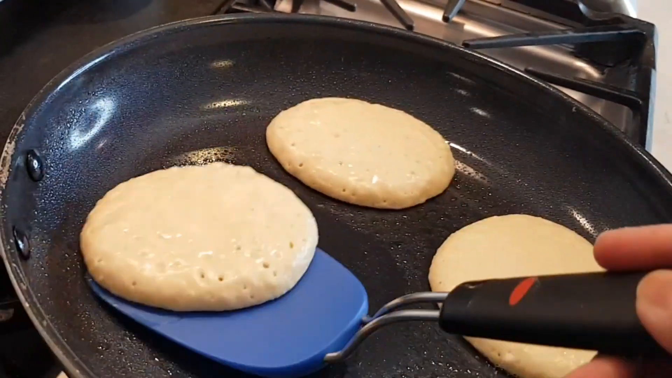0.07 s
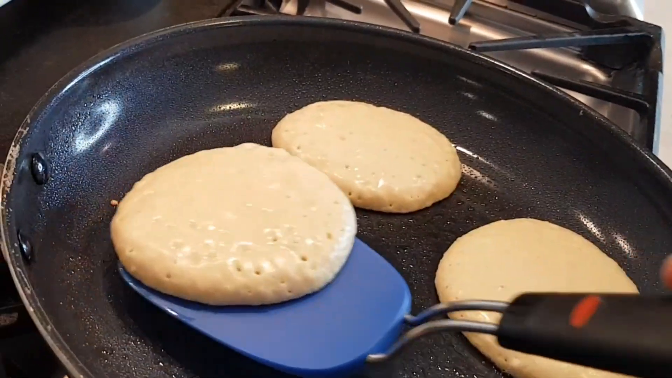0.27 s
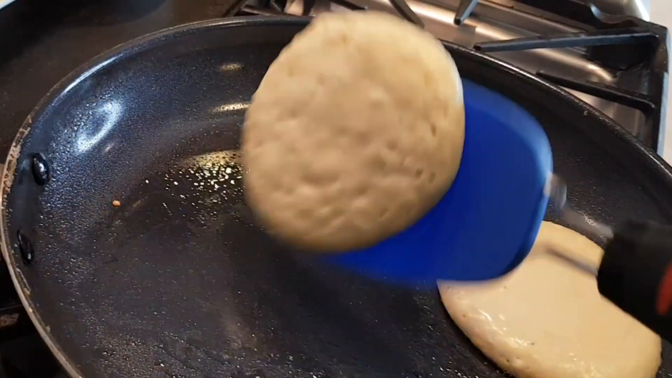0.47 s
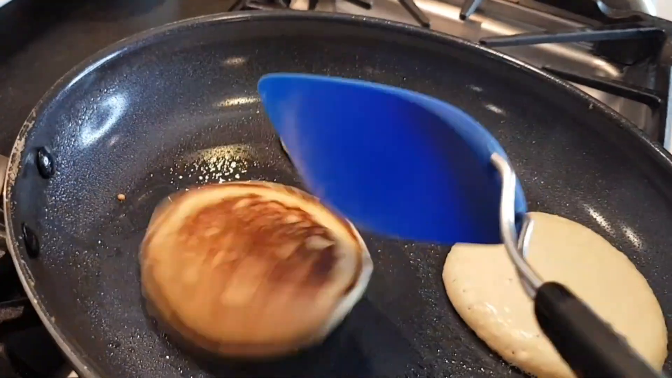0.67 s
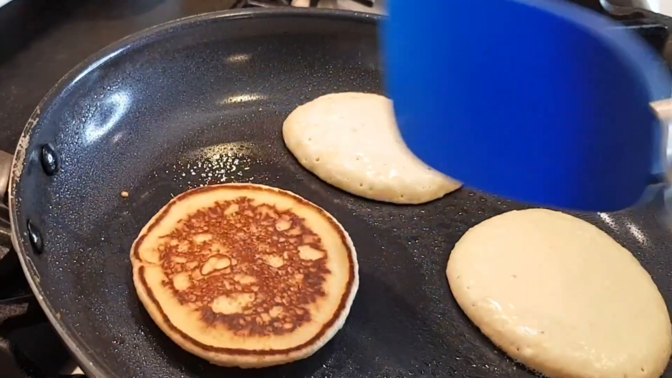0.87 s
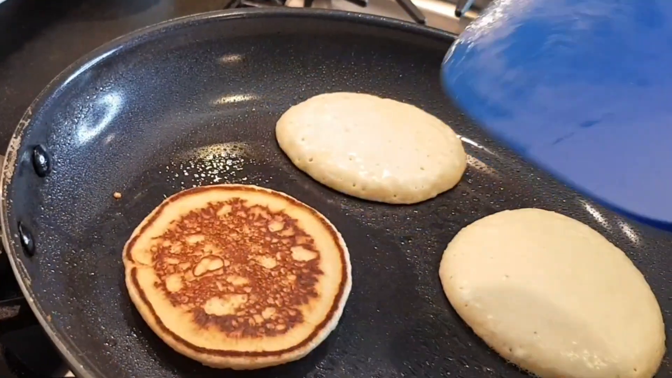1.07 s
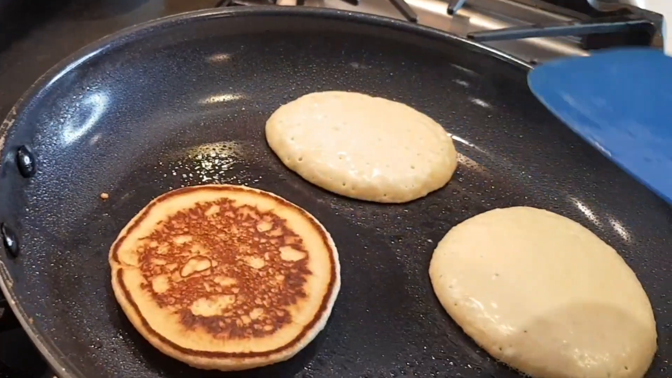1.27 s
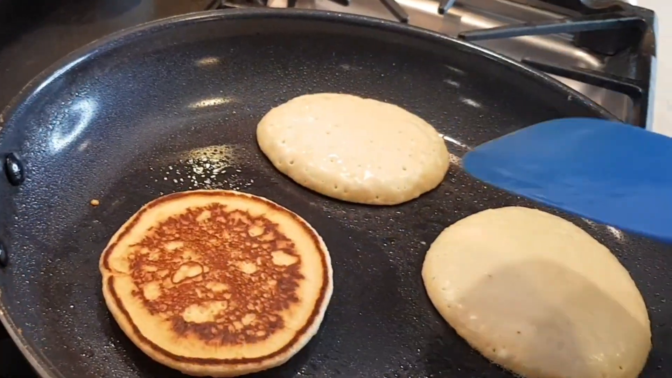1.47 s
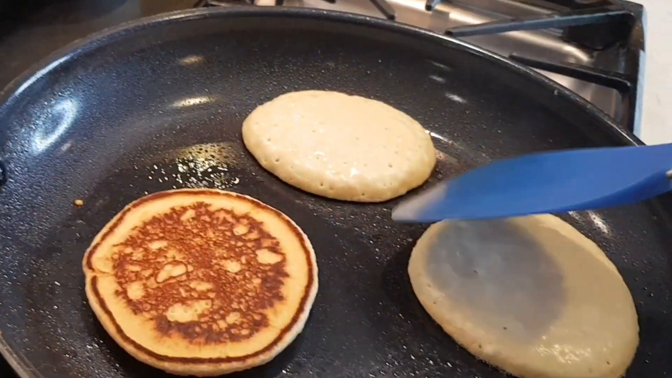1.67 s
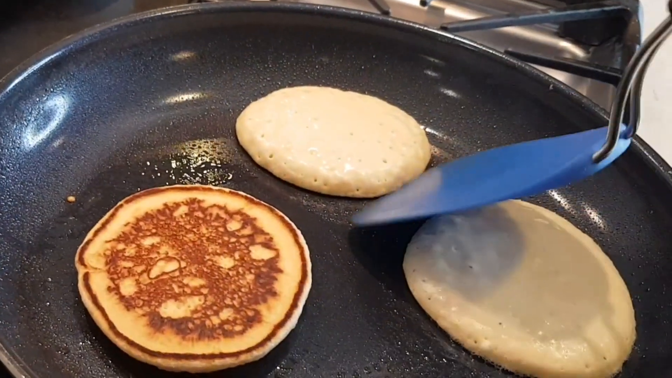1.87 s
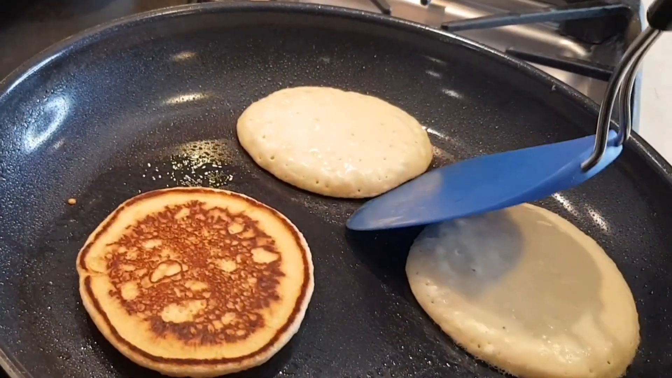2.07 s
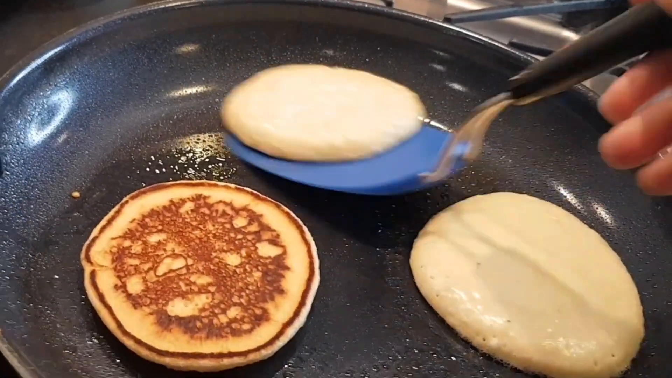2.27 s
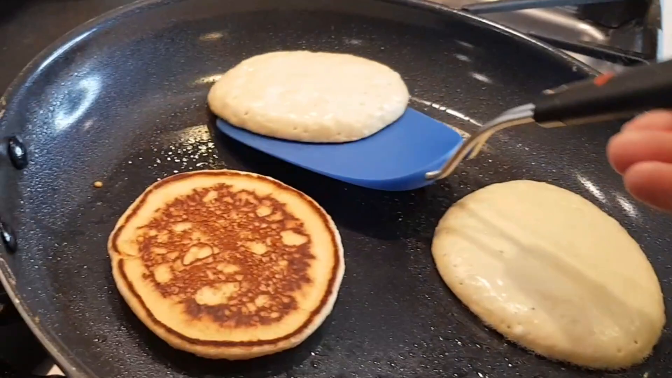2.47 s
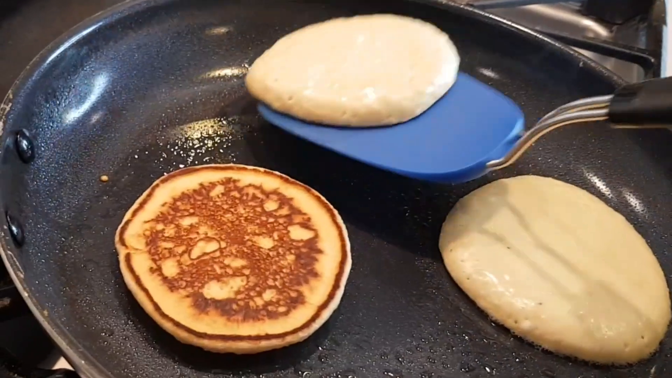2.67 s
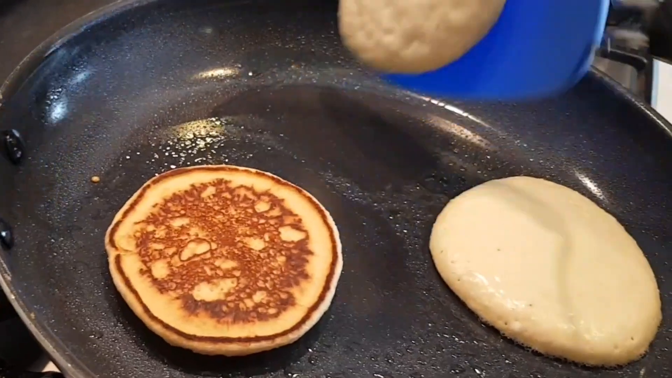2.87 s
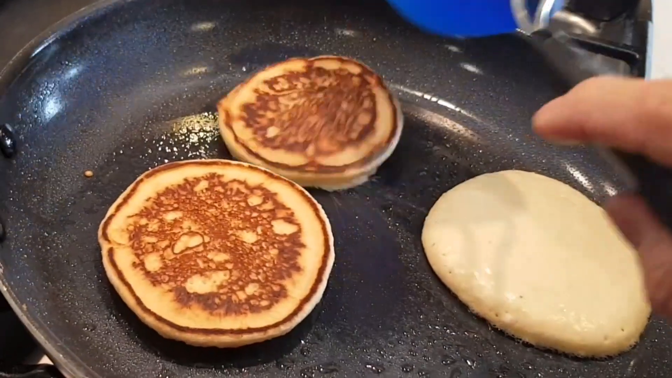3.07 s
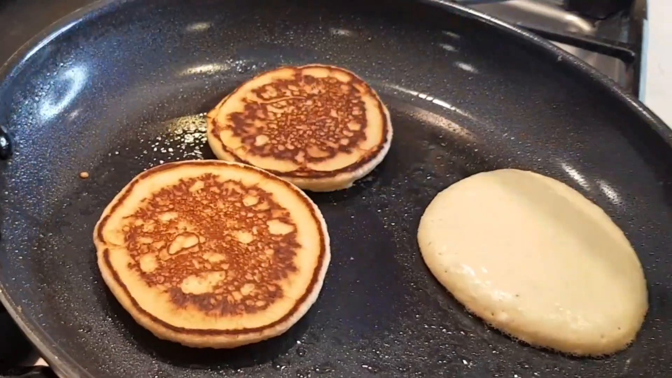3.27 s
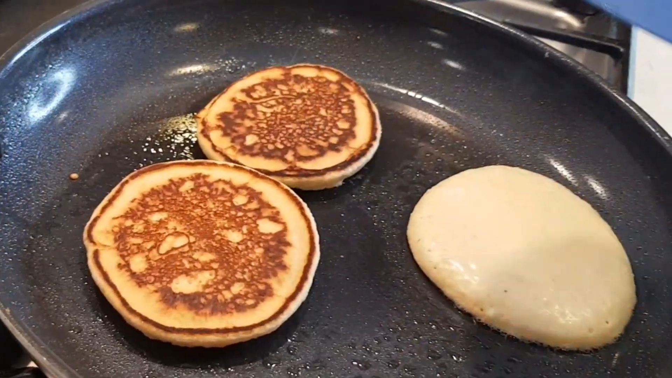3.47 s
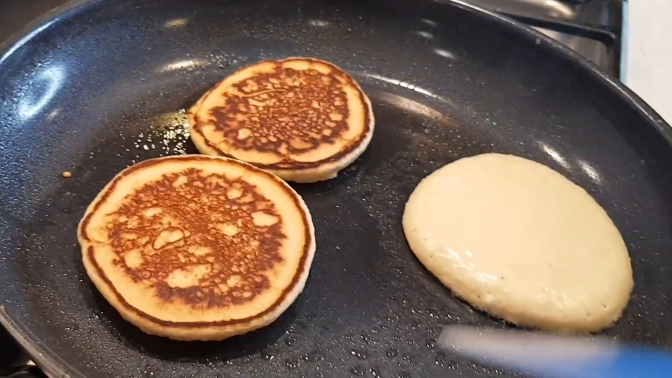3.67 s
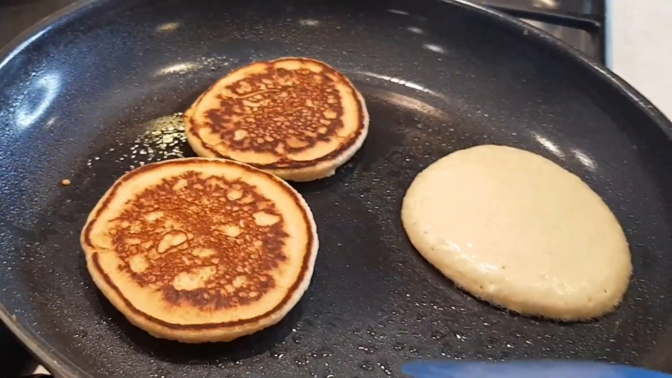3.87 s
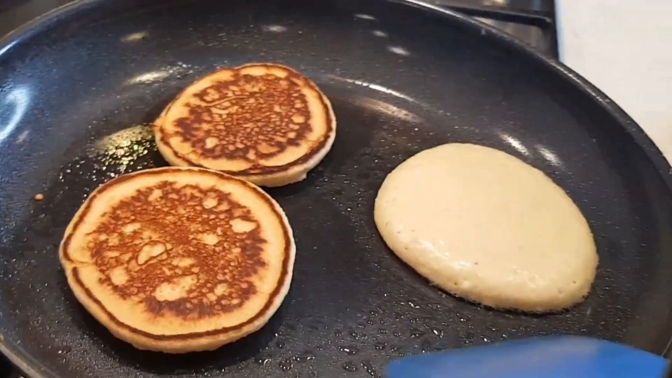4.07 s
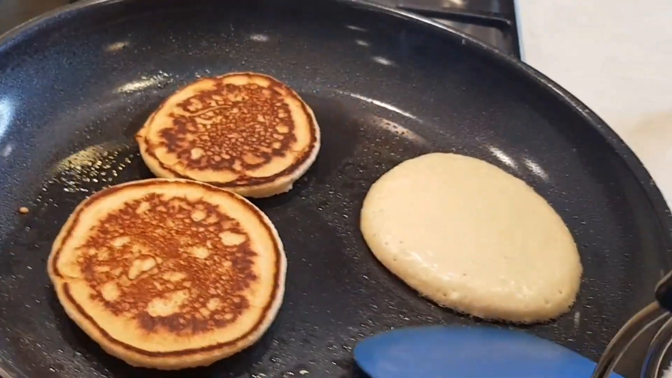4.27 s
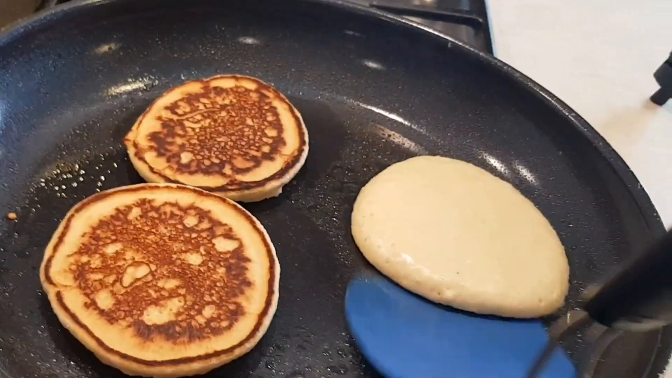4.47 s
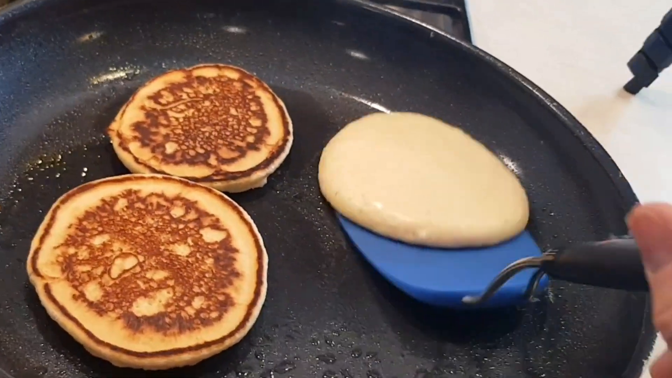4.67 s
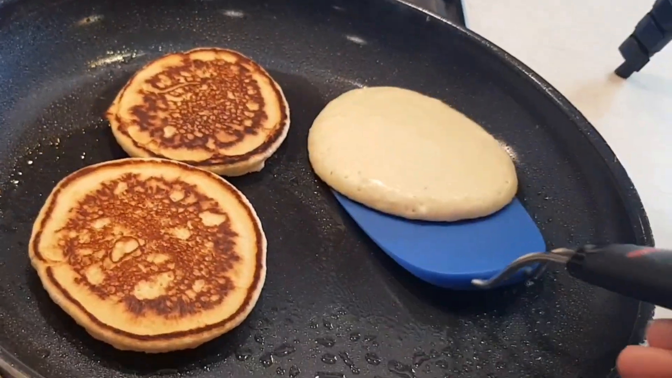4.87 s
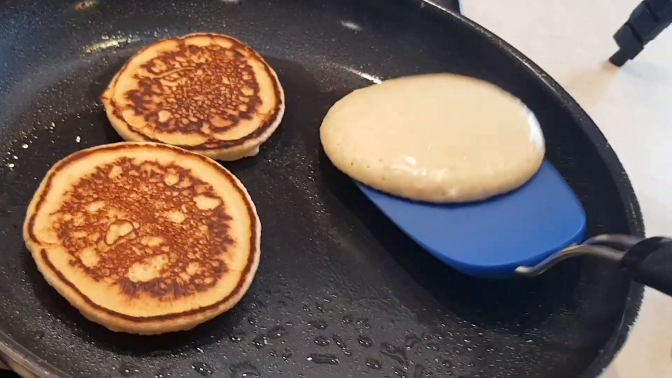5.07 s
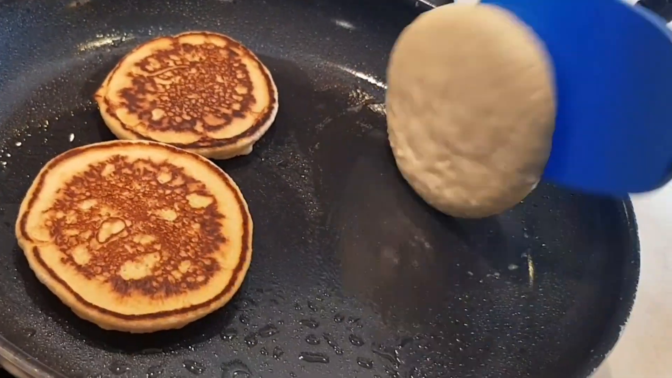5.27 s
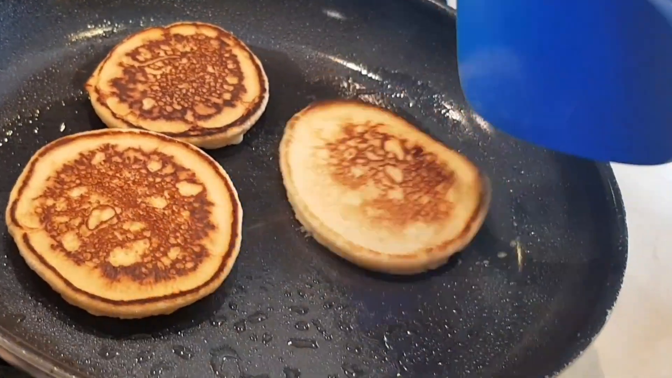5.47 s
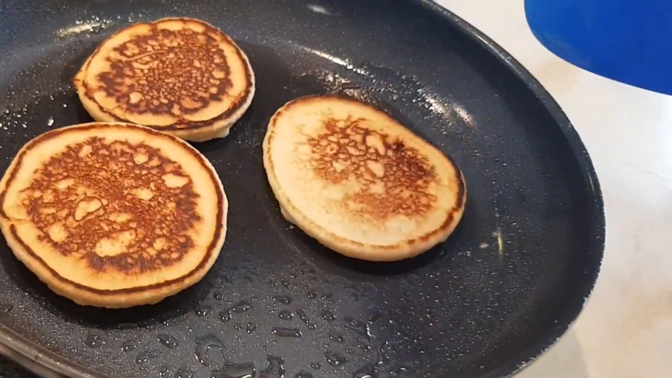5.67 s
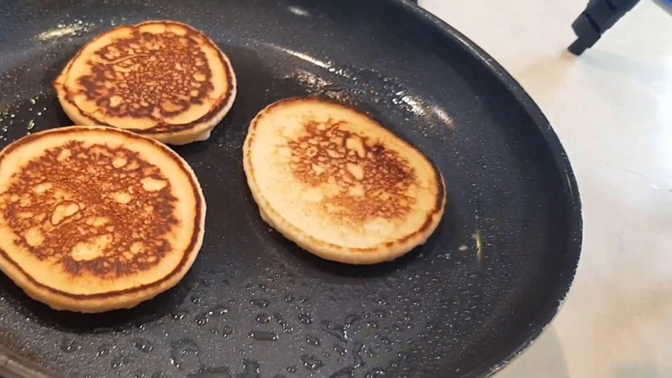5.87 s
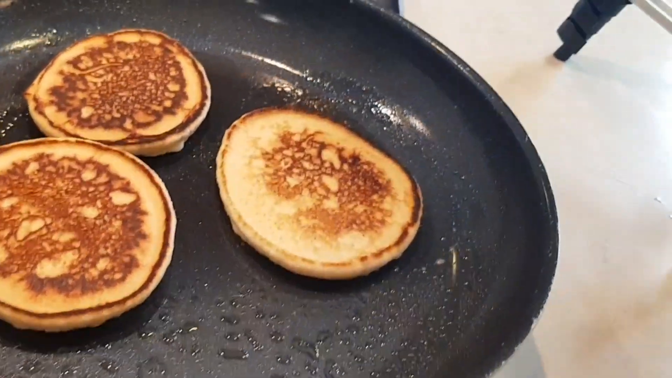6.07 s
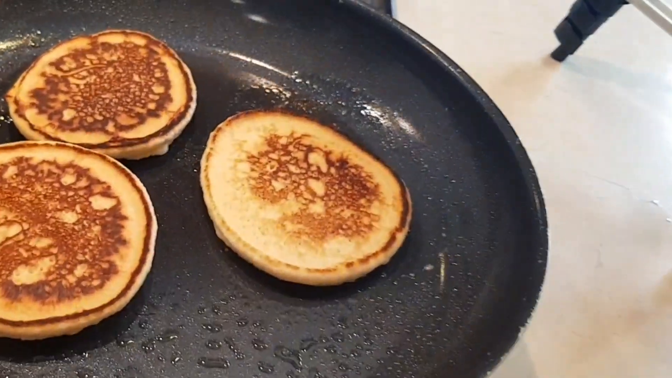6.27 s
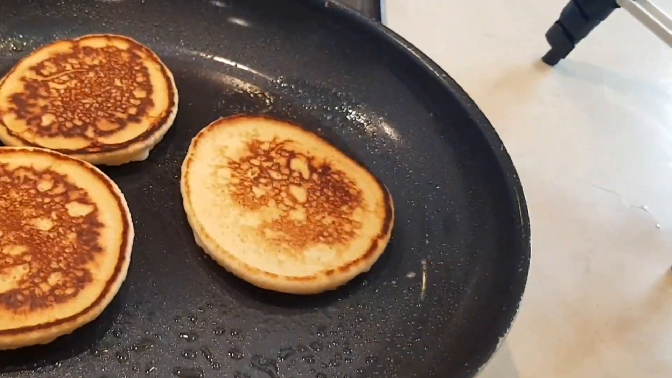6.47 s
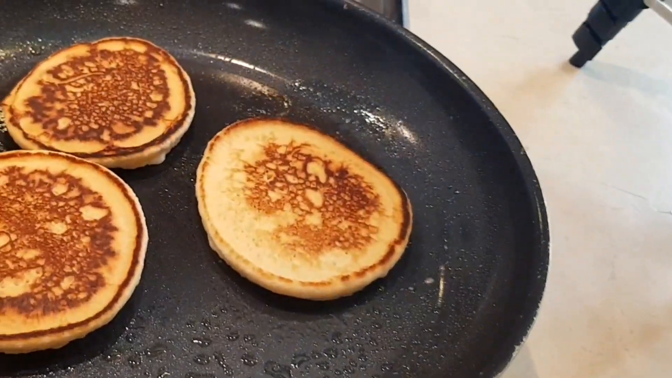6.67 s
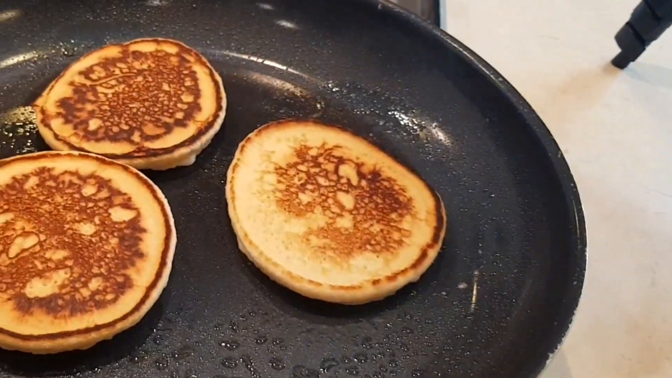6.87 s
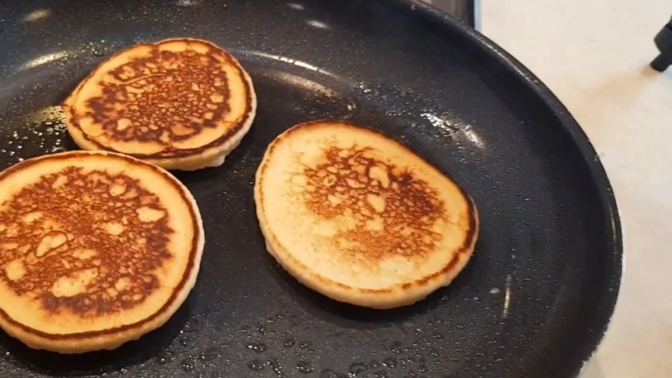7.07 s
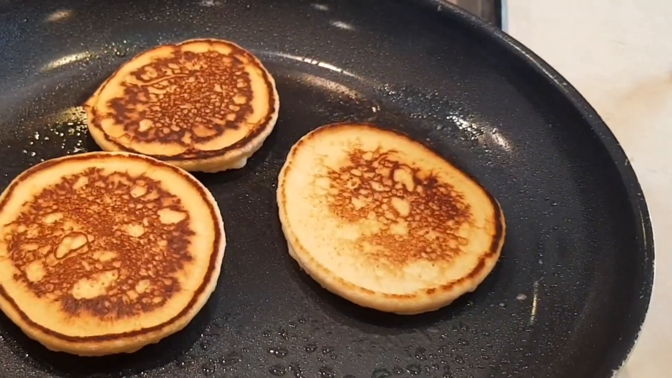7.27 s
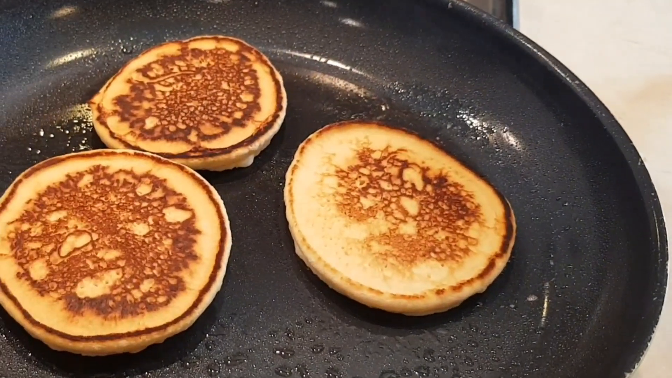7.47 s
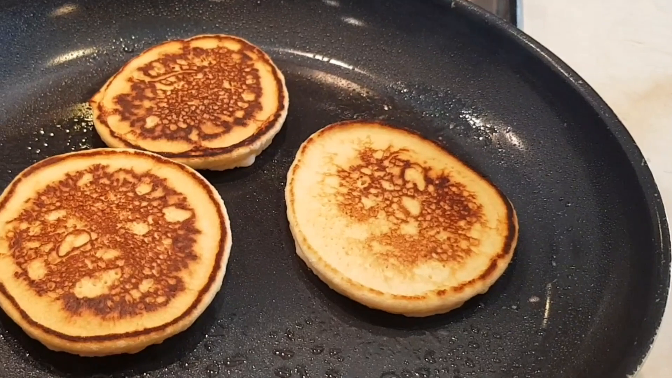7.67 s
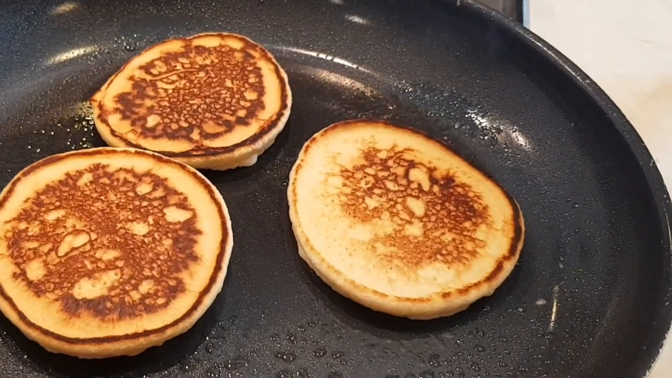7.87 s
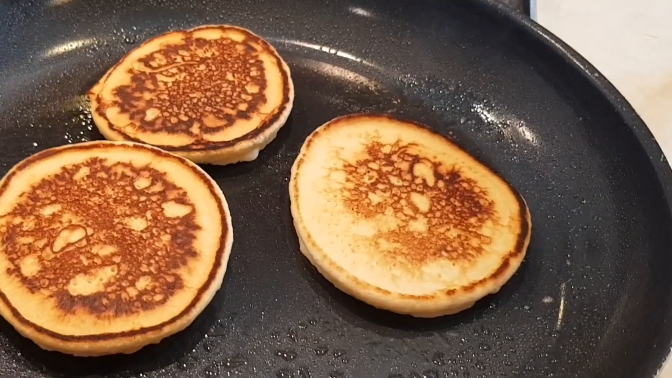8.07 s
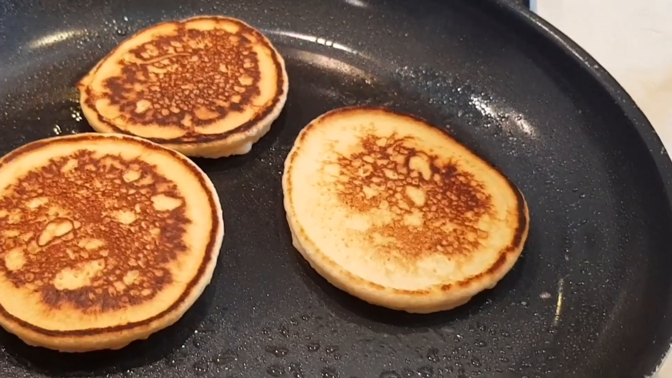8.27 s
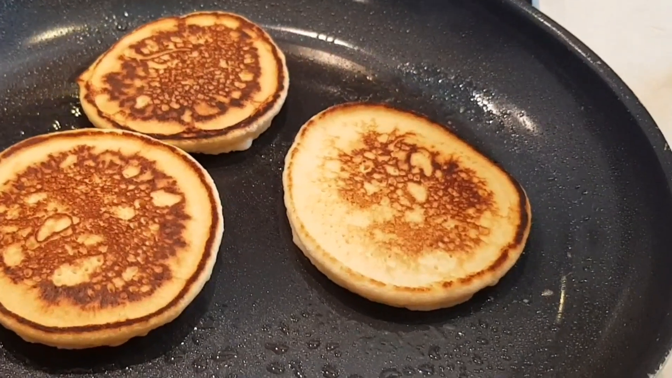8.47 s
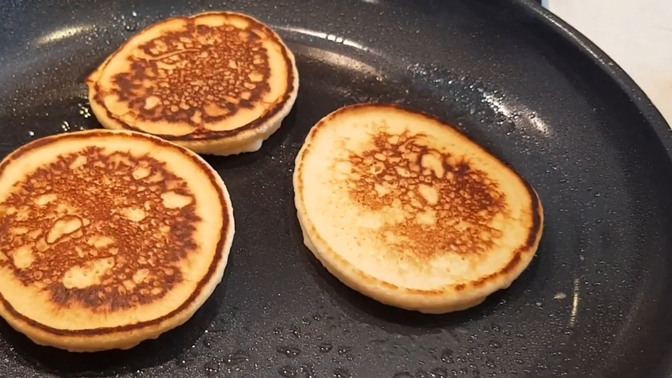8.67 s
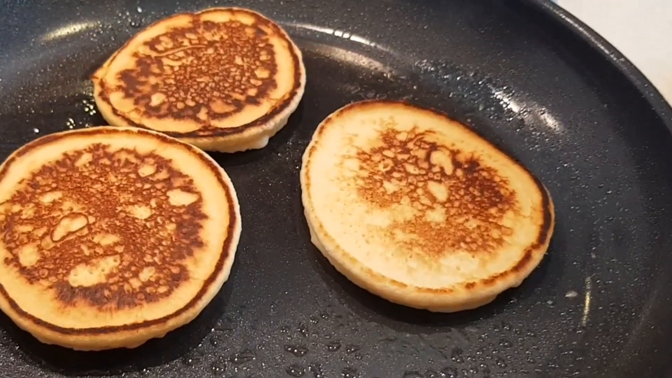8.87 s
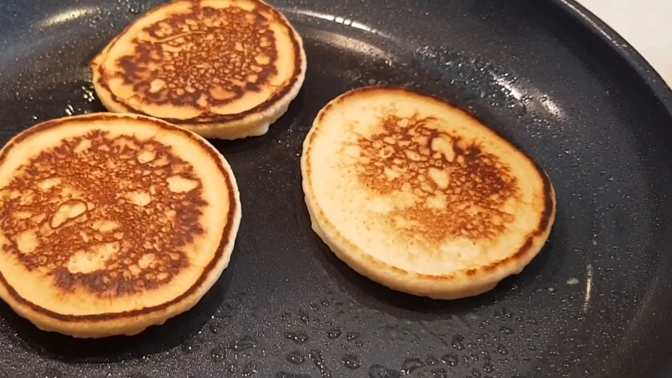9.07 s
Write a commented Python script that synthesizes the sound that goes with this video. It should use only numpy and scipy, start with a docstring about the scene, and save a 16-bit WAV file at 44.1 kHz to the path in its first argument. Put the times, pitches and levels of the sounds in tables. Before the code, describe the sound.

A quiet home kitchen with soft air hush and a faint low hum, heard very close to a frying pan in stereo. A few fat clicks open the scene. At 0.6 s the spatula brushes lightly, and at 0.7-0.8 s batter slaps down; bright sizzle flares, with dense dull pops until about 1.5 s, then fades by 2.5 s. A tiny blade tap comes at 1.95 s and a raspy scrape at 2.3 s. The second cake smacks down at 3.14 s, with fizz and a tiny steam peep, another faint peep at 3.9 s, and snapping spits. A longer scrape swells to 4.6 s. The third, loudest slap hits abruptly at 5.54 s with a shorter, gentler sizzle. Crisp pops cluster around 6.1-6.5 s. A dull, roomy knock further off lands at 6.6 s, a weaker one at 7.7 s. Sparse spits and faint frying continue to about 9 s.

```python
"""A kitchen with a soft hush and a low hum; a phone with two unlike microphone ports is close to a frying pan.
Pancakes sizzle: random clicks, coloured as fizz and roar, follow the level of the fry.
A spatula scrapes under each cake, as dense slips that ring the pan, and flips it: wet batter slaps down as
a swelling noise burst and the sizzle flares, then fades. Fat spits single clicks and steam peeps as short tones.
Further off something is set down twice: dull noise bursts with much of the room."""
import sys
import numpy as np
from scipy import signal
from scipy.fft import rfft, irfft
from scipy.io import wavfile
from scipy.ndimage import uniform_filter1d

SR = 44100
rng = np.random.default_rng(int(sys.argv[2]) if len(sys.argv) > 2 else 0)


def volts_from_decibels(level):
    """Turn decibel levels (scalar or array-like) into linear amplitude factors."""
    exponent = np.asarray(level, float) / 20
    return 10 ** exponent


def wav_out(sig):
    """Save sig, one row per channel (or a flat mono array), as 16-bit PCM at SR to the path in sys.argv[1]."""
    wavfile.write(sys.argv[1], SR, np.round(np.clip(np.atleast_2d(sig).T, -1, 1) * 32767).astype(np.int16))


N = 402191
T = np.arange(N) / SR

# the two microphone ports: pitch_hz, left_db, right_db
PORTS = [(60, 1, -1), (300, 1, -1), (700, 1.5, -3), (1100, 1.5, -9), (2100, 4, -9), (3500, 8, -6),
         (4900, 1.5, -5), (6500, -1.5, -3), (7900, 2, -7), (9000, 2, -1), (10500, 6.5, 1.5),
         (11900, 4.5, 10), (13000, 3, 4), (14300, 7.5, 1.5), (15000, 4, -3)]
# colour of the kitchen's hush: pitch_hz, level_db
HUSH_COLOUR = [(28, -9.5), (52, 2.5), (70, -4.5), (115, -1), (155, 1.5), (180, -6), (230, -8.5),
               (450, -8.5), (700, -14), (1200, -17.5), (2500, -21), (5000, -22), (9000, -23.5),
               (16000, -29.5)]
# likeness of the hush at the two ports: pitch_hz, likeness (0 to 1)
HUSH_LIKENESS = [(45, 0.49), (100, 0.68), (290, 0.8), (640, 0.24), (1400, 0.063), (15000, 0.035)]
# pitch of the humming machine, which slows a little once: time_s, pitch_hz
HUM_PITCH = [(0.0, 43.7), (3.25, 43.7), (3.35, 42.58), (9.12, 42.4)]
# decay of the kitchen, before the share that each distance takes of it: pitch_hz, t60_s
KITCHEN_DECAY = [(200, 0.12), (900, 0.87), (2000, 0.69), (4000, 0.28), (12000, 0.094)]
# things set down further off: time_s, peak_db, centre_hz, treble_fall_db_per_octave, room_db (against direct)
KNOCKS = [(6.643, -27.5, 2150, 10, 4), (7.6644, -42, 347, 16.5, 6.5), (7.673, -36, 1600, 16.5, 2),
          (7.708, -49, 300, 20, -3)]
# modes of the worktop: pitch_hz, width_hz, level_db
WORKTOP_MODES = [(424, 94, -2), (890, 360, 9.5), (1600, 300, 4), (2070, 250, 0), (3010, 170, -8),
                 (3500, 260, -1), (4200, 300, -1)]
# steam through a pinhole: start_s, length_s, pitch_hz, level_db (before the port balance)
WHISTLES = [(3.042, .006, 1700, -52), (3.883, .016, 3610, -49), (3.889, 0.04, 1800, -52)]
# the louder spits of fat: time_s, peak_db (midway between ports), left_over_right_db, dullness_db_per_octave
POPS = [(0.0116, -29, 3, 5), (0.1037, -18.5, 3, -1.5), (0.1211, -35, 0.5, -5), (0.1281, -27, 0.5, -1),
        (0.1785, -29, -2, -3), (0.702, -33, 4, 5), (0.713, -33, 5, 7), (0.721, -28, 15, 2.5),
        (0.8903, -17, 6, -8), (0.909, -23, 3, -13), (0.972, -24, 3, -8), (0.98, -20, 3, -8),
        (1.0205, -18, -1, -7), (1.077, -19, 6, -10), (1.097, -14, 3, -8), (1.1215, -21, 5, -6),
        (1.1325, -16, 3, -11), (1.136, -23, 3, -8), (1.15, -22, 3, -5), (1.1855, -17, 3, -8),
        (1.368, -21.5, 3, -8), (1.463, -24, 3, -8), (1.2872, -23, 4, -8), (1.4133, -16, 4, -5),
        (1.633, -20.5, 1, -2), (1.7349, -23, 8, -1.5), (1.8044, -33, 4, -8), (1.8744, -26, 0, -1),
        (1.902, -29.5, -1.5, 0), (1.9329, -28, 3, -1), (1.971, -27, 5, 4), (1.9816, -25.5, -3, 5.5),
        (2.101, -27, 8, 3), (2.427, -27, 5, 0), (2.4733, -24.5, 4, -2), (2.519, -24, 4, 0.5),
        (2.547, -21, -1, -1.5), (2.5714, -25, 0, -5), (3.769, -25.5, 11, 0.5), (3.795, -25, 5, -7),
        (3.8623, -20, -3, 0), (3.8915, -30, 4, 3.5), (4.004, -20.5, 6, -0.5), (4.0796, -25, 2, -6),
        (4.1515, -16.5, 9, -1.5), (4.383, -33, 19.5, -1), (4.4, -24, 11, 1), (4.408, -30, 10, 1),
        (4.45, -24, 2, -2), (4.7104, -28, -3, -2), (4.8209, -20, 5, -3), (4.8426, -24, 10, -2.5),
        (4.9441, -26, 2, -6), (5.024, -19, 3, -6), (5.4541, -26.5, 1, -4), (5.5046, -25, 8, 0),
        (5.7018, -19, 3, 1.5), (5.83, -25, 0, 0), (6.1288, -26, 1, -3), (6.193, -26.5, 12, 0),
        (6.2755, -20.5, 10, -2), (6.3933, -19.5, 9, 1.5), (6.4283, -22, 8, -0.5), (6.4392, -18.5, 7, 0.5),
        (6.4907, -30, 11, 0), (6.9333, -24.5, 8, 1), (7.633, -30, 9, -2), (7.8095, -28.5, 6, 0.5),
        (8.0435, -37, 19, 4)]
# strokes of the blade over the pan: fastest_s, rise_s, fall_s, level_db, hiss_db (against the rub)
SCRAPES = [(0.566, 0.034, 0.091, -54, -35), (0.685, 0.09, 0.021, -56, -3), (1.958, 0.013, 0.03, -65, -15),
           (2.268, 0.095, 0.065, -50.5, 9), (2.318, 0.07, 0.054, -46.5, 6), (4.611, 0.22, 0.038, -43, 5),
           (5.215, 0.044, 0.12, -58, -30), (5.275, 0.057, 0.093, -59, -30), (5.35, 0.097, 0.33, -61.5, 0)]
# colour of the blade on the coating: pitch_hz, level_db
BLADE_COLOUR = [(500, -29), (1000, -18), (1500, -6), (2400, -10), (3600, 2), (5000, -0.5), (6300, 4.5),
                (8000, 4.5), (12000, -14), (16000, -24)]
# modes of the pan: pitch_hz, width_hz, level_db
PAN_MODES = [(483, 120, 12), (806, 91, 10.5), (1390, 150, 7), (1965, 91, 4), (2330, 51, -1), (2840, 50, -6),
             (3330, 35, 5.5), (3600, 43, 0), (3640, 43, 1.5), (3900, 16, 3.5), (3980, 25, 5),
             (4130, 25, -2), (4390, 25, 3), (4600, 30, -8), (5160, 170, 2)]
# batter landing: time_s, blow_peak_db, rise_s, centre_hz, splash_db
SLAPS = [(0.7061, -41.5, 0.0032, 360, -47.5), (0.7813, -22.5, 0.003, 1500, -31.5),
         (3.08, -41, 0.0025, 1250, -64), (3.1315, -29, 0.0025, 2400, -60),
         (3.1384, -20.5, 0.0027, 2040, -39.5), (3.15, -32, 0.0012, 2600, -60),
         (5.542, -13, 0.00054, 1900, -30)]
# the blade tip touching the pan: time_s, blow_peak_db, rise_s, centre_hz, splash_db
TAPS = [(1.955, -32, 0.00065, 2130, -64)]
# each cake turned over: edge_touches_s, lands_s, roll_down_s, boil_db, boil_life_s (to lose BOIL_LOSS_DB)
FLIPS = [(0.68, 0.774, 0.031, -44, 1.27), (3.063, 3.149, 0.058, -43, 0.96),
         (5.492, 5.545, 0.001, -47.5, 0.5)]
# the steadier simmer under the boil: start_s, hold_s, level_db, fade_db_per_s, roar_db (against the fizz)
SIMMERS = [(0.0, 0.0086, -48.5, 59, -11), (0.792, 1.6, -51, 19, -14), (3.143, 1.54, -54.5, 24, -5.5),
           (5.544, 0.46, -54, 4.5, -5.5)]
# colour of the fizz and of the blade's hiss: pitch_hz, level_db
FIZZ_COLOUR = [(800, -13), (1500, -17.5), (3000, -6.5), (6000, 7), (12000, 4.5), (16000, 3.5)]
# colour of the lower roar: pitch_hz, level_db
ROAR_COLOUR = [(300, -60), (800, -8.5), (1500, -3), (3000, 0.5), (6000, -1.5), (12000, -14.5)]

TOUCH_DB, TOUCH_DB_PER_S, TOUCH_RISE_S = -21, 26, 0.028  # fizz under the first edge, against the boil
FLARE_DB, FLARE_S = 6, 0.085  # burst of steam at landing, against the boil, and its decay time
BOIL_LOSS_DB, BOIL_BEND = 14, 3.03  # the boil holds, then falls ever faster
BED_DB, BED_DB_PER_S = -59, 0.49  # quiet fry: level reckoned at time 0, and its slow fade
TOUCH_ROAR_DB, FLARE_ROAR_DB, BOIL_ROAR_DB, BED_ROAR_DB = 4.5, -6.5, -11, -3  # roar against the fizz


def evened(x):
    """Sets the rms of the mean of the channels to 1."""
    return x / np.sqrt(np.mean(np.mean(np.atleast_2d(x), 0) ** 2) + 1e-20)


def smooth_noise(size):
    """Slow random wavering of rms 1: noise averaged over size samples."""
    return evened(uniform_filter1d(rng.standard_normal(N), size=size))


def read(points, hz, column=1):
    """Reads a spectrum on a log-frequency axis."""
    table = np.transpose(points)
    return np.interp(np.log(hz + 1), np.log(table[0] + 1), table[column])


def add(mix, s, sound):
    """Mixes a two-channel sound in at time s."""
    part = mix[:, round(s * SR):][:, :sound.shape[1]]
    part += sound[:, :part.shape[1]]


def flattened(x, width_hz):
    """Takes the broad chance colour out of a noise burst."""
    spectrum = rfft(x)
    size = max(round(width_hz * x.shape[-1] / SR), 1)
    power = uniform_filter1d(abs(spectrum) ** 2, size=size, axis=-1)
    return irfft(spectrum / np.sqrt(power), x.shape[-1])


def dulled(db_per_octave, low_hz):
    """A slope falling above 1 kHz, with little under low_hz."""
    return lambda hz: -db_per_octave * np.log2(1 + hz / 1000) - 20 * np.log10(1 + (low_hz / (hz + 1)) ** 2)


def around(centre_hz, low_db, high_db):
    """A broad hump that falls by so many dB an octave on either side."""
    def colour(hz):
        ratio = (hz + 1) / centre_hz
        return -10 * np.log10(ratio ** (-low_db / 3) + ratio ** (high_db / 3))
    return colour


def rings(modes, hz, floor_db):
    """The modes of a struck thing over a broad floor, in dB."""
    peaks = sum(volts_from_decibels(2 * db) / (1 + (2 * (hz - f) / width) ** 2) for f, width, db in modes)
    return 10 * np.log10(peaks + volts_from_decibels(2 * floor_db))


def heard(x, colour):
    """Passes x through a source colour (dB of Hz) and the two ports, as causal minimum-phase filters."""
    hz = abs(np.fft.fftfreq(4096, 1 / SR))
    log_gain = np.log(volts_from_decibels([colour(hz) + read(PORTS, hz, column=k) for k in (1, 2)]))
    taps = np.fft.ifft(np.exp(np.conj(signal.hilbert(log_gain)))).real[:, :2048]
    return signal.oaconvolve(x, taps, axes=1)[:, :x.shape[1]]


def grains(per_s, spread_db, ring_s):
    """Random clicks of uneven size; each of 12 spots reaches the two ports by its own short scatter."""
    happens = rng.random(N) < per_s / SR
    size = volts_from_decibels(spread_db * np.minimum(rng.exponential(1, N), 5)) * happens
    spot = rng.integers(0, 12, N)
    t = np.arange(512) / SR
    paths = rfft(rng.standard_normal((12, 2, 512)) * t * np.exp(-2 * t / ring_s))
    scatter = irfft(paths / np.sqrt((abs(paths) ** 2).mean(0)))  # together the spots add no colour
    return sum(signal.oaconvolve((size * (spot == k))[None], scatter[k], axes=1)[:, :N] for k in range(12))


def kitchen(x, t60_share):
    """Room reverberation: a noise tail for each port, each band dying at its own speed."""
    hz, t, z = signal.stft(rng.standard_normal((2, SR // 2)), SR, nperseg=256)
    t60_s = t60_share * read(KITCHEN_DECAY, hz)[:, None]
    tail = signal.istft(z * volts_from_decibels(-60 * t / t60_s), SR, nperseg=256)[1]
    tail = tail * np.minimum(np.arange(tail.shape[1]) / 300, 1)  # soft onset
    tail = np.pad(tail, ((0, 0), (120, 0)))  # delay in samples
    tail = flattened(tail, 300)
    return signal.oaconvolve(x, tail / np.linalg.norm(tail[0]), axes=1)[:, :N]


def hush():
    """The kitchen's air: noise whose level drifts in patches of time and pitch, alike at both ports in the bass."""
    hz, _, z = signal.stft(rng.standard_normal((2, N)), SR, nperseg=2048)
    same = np.clip(read(HUSH_LIKENESS, hz), -1, 1)[:, None]
    patches = uniform_filter1d(rng.standard_normal(z[0].shape), size=6, axis=0)
    patches = uniform_filter1d(patches, size=5, axis=1)
    right = same * z[0] + np.sqrt(1 - same ** 2) * z[1]
    z = np.array([z[0], right]) * volts_from_decibels(2.8 * patches / patches.std())
    noise = signal.istft(z, SR, nperseg=2048)[1][:, :N]
    return volts_from_decibels(-57.5) * evened(heard(noise, lambda hz: read(HUSH_COLOUR, hz)))


def hum():
    """A machine's low hum: one sine of drifting pitch and slowly wavering level, stronger at the left port."""
    level_db, waver_db = -58.5, 0.6  # level before the port balance
    s, pitch_hz = np.transpose(HUM_PITCH)
    waver = evened(uniform_filter1d(smooth_noise(8000), size=8000))
    phase = 2 * np.pi * np.cumsum(np.interp(T, s, pitch_hz)) / SR
    return np.sqrt(2) * volts_from_decibels(level_db + waver_db * waver) * np.sin(phase) * volts_from_decibels([[1.8], [-2.2]])


def knocks():
    """Dull knocks on a worktop, noise bursts of a few milliseconds: the direct sound and what goes to the room."""
    out, wet = np.zeros((2, N)), np.zeros((2, N))
    t = np.arange(-200, 1800) / SR
    chance = rng.standard_normal((len(KNOCKS), 3, 2000))
    for (s, db, hz, fall_db, room_db), noise in zip(KNOCKS, chance):
        rattle = 0.35 * noise[:2] + noise[2]  # mostly shared by the ports
        burst = (t == 0) + 1.5 * rattle * np.exp(-abs(t) / 0.0044) * (t > 0)
        burst = flattened(burst, 600)
        knock = heard(burst, lambda f: around(hz, 6, fall_db)(f) + rings(WORKTOP_MODES, f, floor_db=-5))
        knock = knock * volts_from_decibels([[-1.5], [1.5]])
        knock *= volts_from_decibels(db) / abs(knock.mean(0)).max()
        add(out, s + t[0], knock)
        add(wet, s + t[0], volts_from_decibels(room_db) * knock)
    return out, wet


def whistles():
    """Escaping steam: short wavering sines that start at once and die away, louder at the left port."""
    out = np.zeros((2, N))
    for s, length, hz, db in WHISTLES:
        t = np.arange(0, length, 1 / SR)
        wander = np.cumsum(0.057 * rng.standard_normal(len(t)))
        tone = np.sin(2 * np.pi * hz * t + wander)
        envelope = np.minimum(t / 0.0025, 1) * np.cos(np.pi / 2 * t / length)
        add(out, s, volts_from_decibels(db) * tone * envelope * volts_from_decibels([[5], [-7]]))
    return out


def pops():
    """Each spit of fat is one sharp click with a few close reflections, in a brief spray."""
    out, t = np.zeros((2, N)), np.arange(-400, 1100) / SR
    chance = rng.standard_normal((len(POPS), 2, len(t)))
    lags = rng.integers(-12, 13, len(POPS))  # samples between the ports, by where the drop bursts
    near = np.exp(-abs(t) / np.where(t < 0, .0003, .0004))
    spray = volts_from_decibels(-23.5) * np.exp(-abs(t) / np.where(t < 0, .0045, .0055))
    for (s, db, pan_db, dull_db), noise, lag in zip(POPS, chance, lags):
        burst = (t == 0) + noise * (0.11 * near + spray)
        click = heard(flattened(burst, 1500), dulled(dull_db, 1070))
        click[1] = np.roll(click[1], lag)
        click /= abs(click).max(1)[:, None]
        add(out, s + t[0], volts_from_decibels(db) * click * volts_from_decibels([[pan_db / 2], [-pan_db / 2]]))
    return out


def scrapes():
    """The blade edge chatters over the coating in dense slips that ring the pan."""
    edge_db, rise_bend, fall_bend = 45, 1.61, 3  # strokes start and end this far down, on a rounded arch
    ring_from_db, ring_per_db = -48, 1.3  # harder strokes bring the pan's modes out of the rub
    balance = volts_from_decibels([[.8], [-2.5]])
    slips = grains(per_s=7000, spread_db=2.2, ring_s=.001)
    ringing = heard(slips, lambda hz: read(BLADE_COLOUR, hz) + rings(PAN_MODES, hz, floor_db=-9.0))
    body = evened(ringing) * balance
    rub = evened(heard(slips, around(1320, 34, 5.9))) * balance
    hiss = evened(heard(slips[::-1], lambda hz: read(FIZZ_COLOUR, hz))) * volts_from_decibels([[2.5], [-2.5]])
    judder = volts_from_decibels(1.0 * smooth_noise(260))  # uneven pressure on the blade, dB
    out = np.zeros((2, N))
    for s, rise, fall, db, hiss_db in SCRAPES:
        away = np.where(T < s, (s - T) / rise, (T - s) / fall)
        arch_db = -edge_db * away ** np.where(T < s, rise_bend, fall_bend)
        stroke = (away < 1) * volts_from_decibels(db + arch_db)
        ring = volts_from_decibels(ring_per_db * (db - ring_from_db))
        out += stroke * (judder * (rub + ring * body) + volts_from_decibels(hiss_db) * hiss)
    return out


def slaps():
    """Batter rolls onto the pan: contact swells to a blow that rings it, then steam splashes; tip taps likewise."""
    out, t = np.zeros((2, N)), np.arange(9000) / SR - .04
    events = SLAPS + TAPS
    chance = rng.standard_normal((len(events), 5, len(t)))
    thump_gains = [volts_from_decibels(-18)] * len(SLAPS) + [0] * len(TAPS)  # only a landing cake has weight
    for (s, blow_db, rise, hz, splash_db), noise, thump_gain in zip(events, chance, thump_gains):
        swell = np.exp(np.minimum(t, 0) / max(rise, .0001))
        decay = np.exp(-t / (0.66 * rise + 0.0014)) + 0.044 * np.exp(-t / 0.019)
        contact = swell * np.where(t < 0, 1, decay)
        contact = contact * (noise[:2] + 0.88 * noise[2] * abs(noise[2]))
        contact = flattened(contact, 500)
        blow = heard(contact, lambda f: around(hz, 12, 8)(f) + rings(PAN_MODES, f, floor_db=-0.5))
        thump = heard(contact, lambda f: around(330, 7, 14)(f) + rings(PAN_MODES, f, floor_db=-9))
        blow = blow / abs(blow.mean(0)).max() + thump_gain * thump / abs(thump.mean(0)).max()
        splash = evened(heard(noise[3:], dulled(-0.24, 470)))
        splash = splash * swell * volts_from_decibels(-60 * np.maximum(t, 0) / 0.21)  # t60 in s
        add(out, s + t[0], volts_from_decibels(blow_db) * blow + volts_from_decibels(splash_db) * splash)
    return out


def fry_levels():
    """Gains of fizz and roar: touch, flare and boil of each flip over the simmers and the bed, summed as power."""
    # each part: gate, fizz dB, roar dB against the fizz
    parts = [(T > FLIPS[0][1], BED_DB - BED_DB_PER_S * T, BED_ROAR_DB)]
    for touch, land, roll, boil_db, life in FLIPS:
        t = T - land
        soft = np.clip((T - touch) / TOUCH_RISE_S, 0, 1) ** 2
        growth_db = TOUCH_DB_PER_S * np.minimum(T - touch, land - touch)
        flare_db = 20 / np.log(10) * np.where(t < 0, t / max(roll, 1e-4), -t / FLARE_S)
        loss_db = BOIL_LOSS_DB * (abs(t) / life) ** BOIL_BEND
        parts += [(soft * (t < 0), boil_db + TOUCH_DB + growth_db, TOUCH_ROAR_DB),
                  (soft, boil_db + FLARE_DB + flare_db, FLARE_ROAR_DB),
                  (t >= 0, boil_db - loss_db, BOIL_ROAR_DB)]
    for start, hold, db, fade, roar_db in SIMMERS:
        parts.append((T >= start, db - fade * np.maximum(T - start - hold, 0), roar_db))
    fizz_power = [gate * volts_from_decibels(2 * db) for gate, db, _ in parts]
    roar_power = [power * volts_from_decibels(2 * roar_db) for power, (_, _, roar_db) in zip(fizz_power, parts)]
    return np.sqrt(sum(fizz_power)), np.sqrt(sum(roar_power))


def sizzle():
    """Steam bubbles burst under the batter: a dense fizz with larger crackles and spits, over a lower roar."""
    fizz_gain, roar_gain = fry_levels()
    flutter = volts_from_decibels(0.6 * smooth_noise(700))  # of the whole fry, dB
    lurch = volts_from_decibels(1.0 * smooth_noise(2500))  # the roar comes and goes on its own, dB
    dense = evened(grains(per_s=5000, spread_db=0.5, ring_s=0.00054))
    crackle = evened(grains(per_s=400, spread_db=2.8, ring_s=0.0005))
    spits = evened(grains(per_s=60, spread_db=2.5, ring_s=0.0004))
    bubbles = dense + volts_from_decibels(-5) * crackle + volts_from_decibels(-12.5) * spits
    fizz = evened(heard(bubbles, lambda hz: read(FIZZ_COLOUR, hz)))
    rumble = dense[::-1] + volts_from_decibels(-11.0) * crackle  # ports swapped, so that it spreads unlike the fizz
    roar = evened(heard(rumble, lambda hz: read(ROAR_COLOUR, hz)))
    return flutter * (fizz_gain * fizz + roar_gain * lurch * roar)


def scene():
    """Near sounds with a little of the room; far knocks with much of it, dulled by the furnishings."""
    background = hush() + hum()
    far, wet = knocks()
    wet = signal.lfilter(*signal.butter(1, 2400, fs=SR), wet)
    near = whistles() + pops() + scrapes() + slaps() + sizzle()
    near_room = kitchen(volts_from_decibels(-9.5) * near, t60_share=0.46)
    far_room = kitchen(wet, t60_share=0.47)
    return background + far + far_room + near + near_room


def roll_off(x):
    """The treble ends steeply here."""
    return signal.sosfilt(signal.butter(12, 16500, fs=SR, output="sos"), x)


def record(dry):
    """The phone's band limit, whose top opens only while the sound is loud."""
    edge_hz, loud_edge_hz = 14900, 15600
    opens_db, opens_over_db = -49, 4  # the top opens from this level on, over so many dB
    shut, wide = (signal.oaconvolve(dry, signal.firwin(255, hz, window=("kaiser", 7), fs=SR)[None], "same")
                  for hz in (edge_hz, loud_edge_hz))
    power = abs(uniform_filter1d((dry ** 2).mean(0), size=1024))
    level_db = 10 * np.log10(power + 1e-12)
    opening = np.clip((level_db - opens_db) / opens_over_db, 0, 1)
    mix = shut + opening * (wide - shut)
    return roll_off(mix)


dry = scene()
out = record(dry)
wav_out(out)
```